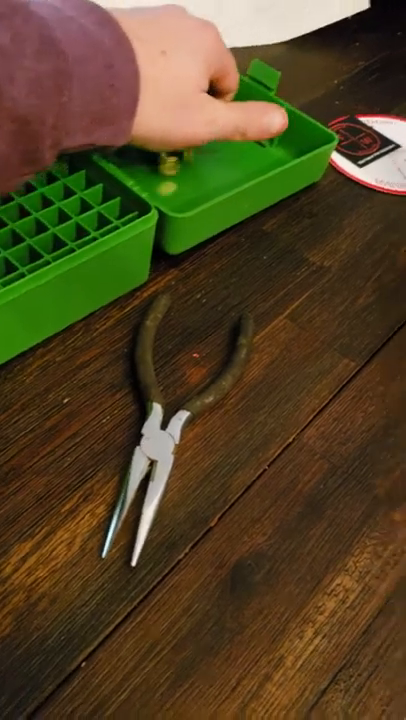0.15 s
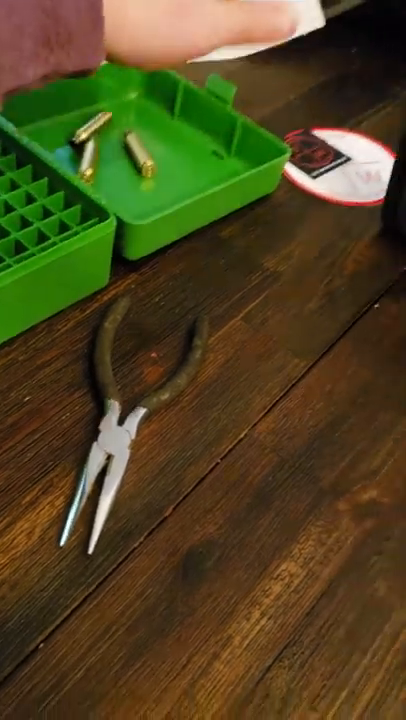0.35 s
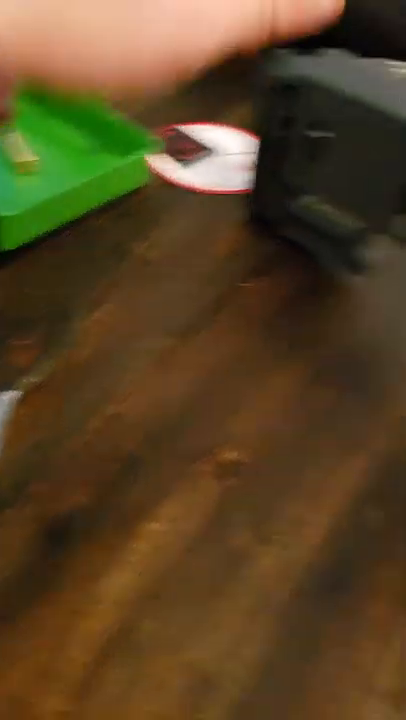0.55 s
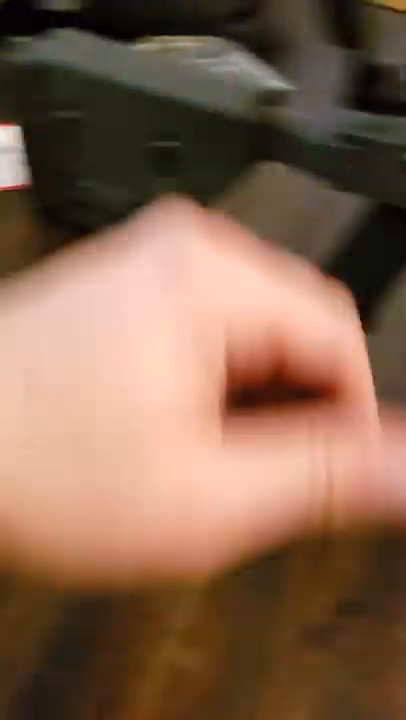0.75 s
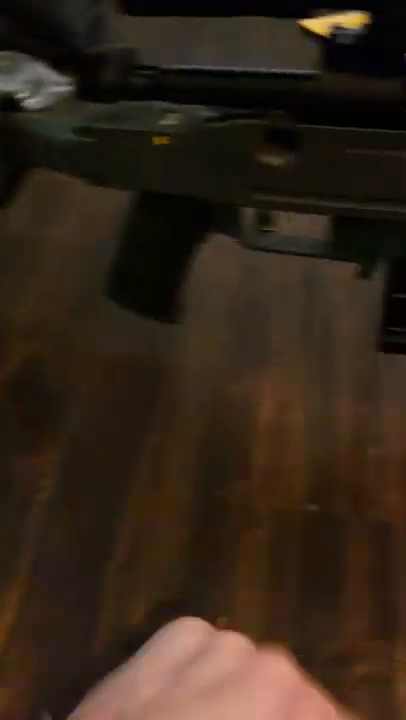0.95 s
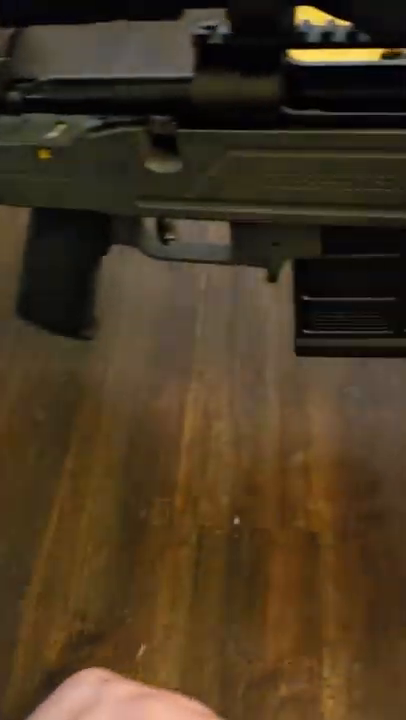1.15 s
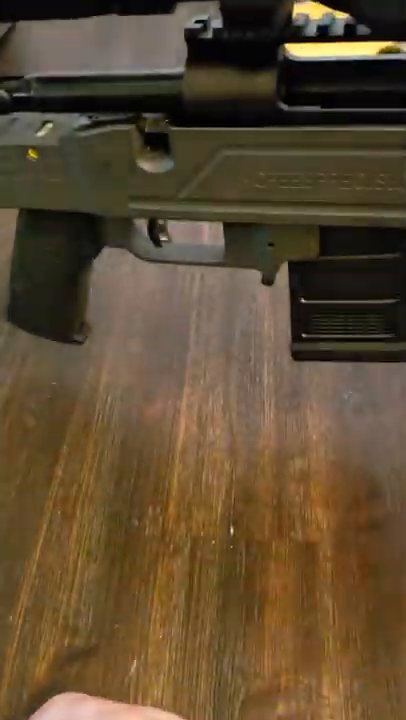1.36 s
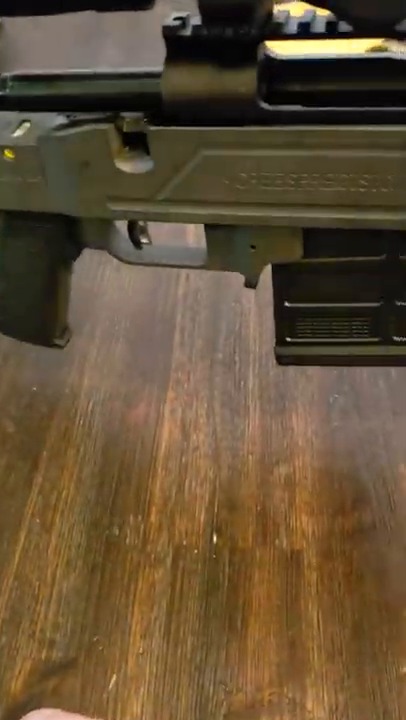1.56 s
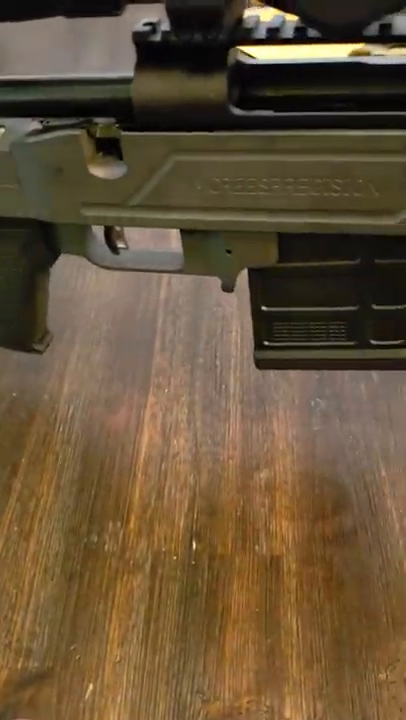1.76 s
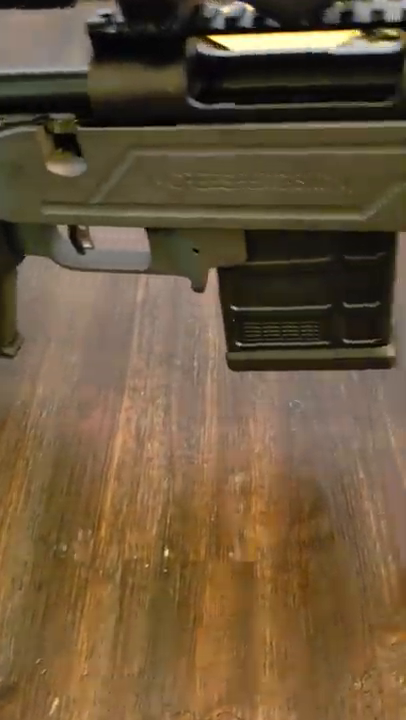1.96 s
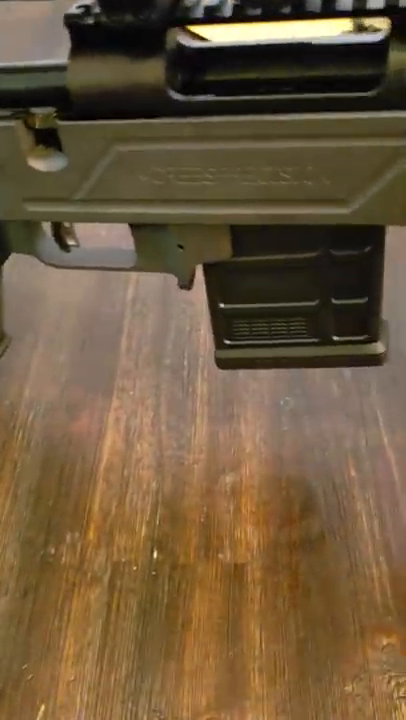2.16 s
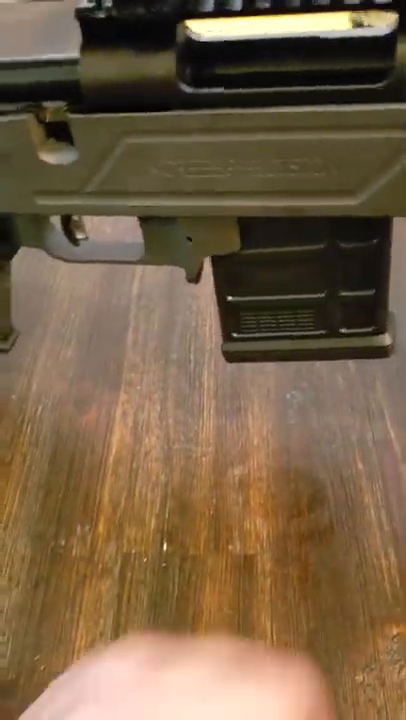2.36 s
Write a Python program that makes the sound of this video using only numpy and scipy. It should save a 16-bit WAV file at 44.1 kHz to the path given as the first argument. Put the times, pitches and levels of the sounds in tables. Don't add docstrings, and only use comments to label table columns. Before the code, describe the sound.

A sharp burst of small brass cases hitting thin plastic, a softer woody thud, light rattling, then a firm click and a louder snap of plastic parts, heard by a close phone microphone in a quiet room.

```python
import sys
import numpy as np
from scipy import signal
from scipy.fft import rfft, irfft
from scipy.io import wavfile
from scipy.ndimage import uniform_filter1d, map_coordinates

SR = 44100
rng = np.random.default_rng(int(sys.argv[2]) if len(sys.argv) > 2 else 0)


def ratio_of_db(decibels):
    return 10 ** (np.asarray(decibels, float) / 20)


def output_pcm(signal):
    pcm = np.clip(np.atleast_2d(signal).T, -1, 1) * 32767
    wavfile.write(sys.argv[1], SR, np.round(pcm).astype(np.int16))


N = 105840

# mode in Hz, level in dB, t60 in seconds.
GRIP_MODES = [(296, -9, 0.14), (508, 1.5, 0.073), (783, -9, 0.14), (972, -5, 0.06), (1267, 0, 0.047),
              (1900, -8, 0.087), (2380, -4.5, 0.058), (2982, -4.5, 0.096), (4760, -15, 0.073)]


def band(x, lo_hz, hi_hz):
    return signal.sosfilt(signal.butter(2, [lo_hz, min(hi_hz, 20000)], "band", fs=SR, output="sos"), x)


def noise_band(hz, width_hz):
    return band(pair(N), hz - width_hz / 2, hz + width_hz / 2) * np.sqrt(SR / 2 / width_hz)


def ring_down(t, t60):
    return np.exp(-np.log(1000) * t / t60)


def curve(table):
    seconds, db = np.array(table).T
    return ratio_of_db(np.interp(np.arange(N) / SR, seconds, db))


def colour(x, tone):
    f = np.maximum(np.arange(N // 2 + 1) * SR / N, 1)
    hz, db = np.array(tone).T
    y = irfft(rfft(x) * ratio_of_db(np.interp(np.log(f), np.log(hz), db)), N)
    return y / np.sqrt(np.mean(y ** 2))


def pair(n):
    mid, side = rng.standard_normal((2, n))
    side = signal.sosfilt(signal.butter(2, 520, "high", fs=SR, output="sos"), side)
    return np.array([mid + side, mid - side]) / np.sqrt(2)


def walk(rate):
    k = int(SR / rate)
    steps = np.repeat(rng.standard_normal(N // k + 1), k)
    return 1.3 * uniform_filter1d(uniform_filter1d(steps, k), k)[:N]


def place(x, pan_db, lag, skew=0.54):
    scatter_s, scatter = .002, .2
    left = map_coordinates(x, [np.arange(N) - lag], mode="nearest")
    taps = rng.standard_normal(300) * np.exp(-np.arange(300) / SR / scatter_s)
    high = band(x, 600, 15000)
    scattered = signal.fftconvolve(high, taps / np.linalg.norm(taps))[:N]
    echo = skew * (signal.hilbert(high).imag + scatter * scattered)
    return np.array([left * ratio_of_db(pan_db / 2) + echo, x * ratio_of_db(-pan_db / 2) - echo])


def blows(rows, modes, push_s=0.00055, rough=0.91, scatter_db=3, detune=.022):
    crack_s, crack_cycles, tick_s, air_db = 0.00077, 0.87, .0016, -5.0
    out, t = np.zeros(N + SR), np.arange(SR // 4) / SR
    hz, db, t60 = np.array(modes).T[:, :, None]
    rise = 1 - np.exp(-t / push_s)
    for s, peak_db, crack_hz, tick_db, body_db in rows:
        level_chance, pitch_chance = rng.standard_normal((2, len(modes), 1))
        noise = rng.standard_normal((len(modes), len(t)))
        hiss = rng.standard_normal(len(t))

        crack_noise = band(hiss, crack_hz / 2, crack_hz * 1.5) * np.sqrt(SR / 3 / crack_hz)
        crack = np.sin(2 * np.pi * crack_hz * t) + 0.28 * crack_noise
        crack = crack * np.exp(-t / (crack_s + crack_cycles / crack_hz))

        tick = band(hiss, 1500, 12000) + ratio_of_db(air_db) * band(hiss, 13000, 16800)
        tick = tick * np.exp(-t / tick_s)

        cluster = np.array([band(v, f / 1.14, f * 1.155) * np.sqrt(SR / f) for v, f in zip(noise, hz[:, 0])])
        tone = np.sin(2 * np.pi * hz * (1 + detune * pitch_chance) * t) + rough * cluster
        body = (ratio_of_db(db + scatter_db * level_chance) * tone * ring_down(t, t60)).sum(axis=0)

        i = int(s * SR)
        blow = rise * (1.545 * crack + ratio_of_db(body_db) * body / 3) + ratio_of_db(tick_db) * tick
        out[i:i + len(t)] += ratio_of_db(peak_db) * blow
    return out[:N]


def case_drops():
    # start in seconds, peak in dB, crack pitch in Hz, sharp tick in dB, body in dB.
    drop_rows = [(.2314, -7.5, 3510, -3.5, -10), (.2435, -21.5, 12000, 2.5, -27),
                 (.2460, -12.5, 3600, -12.5, -13.5), (.2475, -16.5, 4870, -11, -14),
                 (.2545, -16, 4200, -13.5, 0), (.2590, -16.5, 5560, -9, -5),
                 (.2652, -14.5, 2000, -13, -2.5), (.2698, -15, 2500, -8.5, -6.5),
                 (.2728, -19.5, 5000, -1, -15), (.2748, -6.5, 1696, -1, -12), (.2830, -19, 2100, -12.5, -4),
                 (.2875, -18, 5000, -9, -4), (.2928, -20.5, 4500, -7, -5), (.2958, -13, 1502, -9.5, -4),
                 (.2980, -11, 5650, 2, -16), (.3000, -9.5, 2230, -5, -15), (.3050, -17.5, 520, -23.5, -7.5),
                 (.3072, -19.5, 1120, -19, -6.5), (.3185, -22.5, 1900, -15, -8.5),
                 (.3255, -17.5, 2060, -14.5, -9), (.3282, -13, 1140, -13, -6), (.3290, -20, 2200, -16, -10),
                 (.3335, -20, 2140, -13.5, -9), (.3460, -29.5, 1500, -11, -0.5), (.4205, -52, 11100, 3, -5),
                 (.4950, -27.5, 1333, -18, -8.5), (.4954, -23.5, 2295, -41, -9),
                 (.4958, -32, 4160, -30, -10.5), (.5326, -22.5, 3860, -6, -5.5),
                 (.5360, -24, 1740, -36, -15.5), (.5445, -24.5, 2570, -12, -11.5)]
    # mode in Hz, level in dB, t60 in seconds.
    tray_modes = [(276.6, -12.5, 0.37), (408.8, -8, 0.24), (532, -10.5, 0.12), (1205, -1.5, 0.093),
                  (1790, -2, .06), (2120, 0, .045), (2900, -6.5, .04), (3730, -9.5, 0.056),
                  (4600, -15, .04)]
    return place(blows(drop_rows, tray_modes), 1.3, -0.17)


def brass():
    # start in seconds, level in dB, length until damped in seconds, t60 in seconds, pitch in Hz.
    wall_rings = [(0.161, -52, 0.023, .12, 11100), (.195, -55.5, 0.038, 0.24, 11300),
                  (0.2345, -20, 0.011, 0.32, 11170), (0.2466, -16, 0.031, 1.7, 11230),
                  (0.278, -17, .019, 1.3, 11280), (.301, -36, .014, .3, 11340),
                  (0.301, -40, 0.15, 0.33, 11370), (0.533, -44.5, 0.099, 0.15, 11250),
                  (1.238, -51, 0.022, .2, 11060), (1.262, -56, 0.014, 0.26, 11200),
                  (1.277, -51.5, 0.063, 0.17, 11130), (2.034, -45.5, 0.062, 0.2, 11100)]
    swell_s, damp_s, split_hz, partner_db = .003, .006, 110, -13.0
    out, t = 0, np.arange(N) / SR
    for s, db, length, t60, hz in wall_rings:
        u = np.maximum(t - s, 0)
        tone = np.sin(2 * np.pi * np.array([[hz], [hz + split_hz]]) * u)
        fade = ring_down(u, t60) * np.exp(-np.maximum(u - length, 0) / damp_s)
        out = out + ratio_of_db(db) * (1 - np.exp(-u / swell_s)) * fade * tone
    lower, upper = out * ratio_of_db(1.5 * walk(150))
    return place(lower, 2.7, .5, skew=0) + ratio_of_db(partner_db) * place(upper, 1.5, -1.4, skew=0)


def thuds():
    # start in seconds, peak in dB, crack pitch in Hz, sharp tick in dB, body in dB.
    thud_rows = [
        (1.0524, -20.5, 865, -30, -5),
        (1.0560, -20.5, 1250, -49, -5.5),
        (1.0590, -23.5, 584, -30, -4),
        (1.0625, -20.5, 530, -23, -5),
        (1.0630, -32, 3740, -10, -27),
        (1.0660, -32, 597, -19, -10),
        (1.0690, -46, 7330, 3, -14),
        (1.0715, -25, 2700, -14, -2.5),
        (1.0830, -31, 500, -31, -11),
        (1.0910, -50, 2050, -22, 4),
    ]
    # mode in Hz, level in dB, t60 in seconds.
    table_modes = [(46.4, -22, 0.84), (164.6, 2, 0.11), (276, -10.5, 0.14), (525.4, 2, 0.093),
                   (619, -10, 0.061), (970, -5.5, 0.09), (1250, -19, 0.05), (1968, -14, 0.072)]
    return place(blows(thud_rows, table_modes, push_s=0.00073), -2.2, 5.4, skew=0.2)


def rattles():
    # start in seconds, peak in dB, crack pitch in Hz, sharp tick in dB, body in dB.
    rattle_rows = [(1.2108, -29.5, 5400, -10.5, -7), (1.2250, -49, 10500, -13, -15),
                   (1.2282, -50, 13000, -12, -1), (1.2375, -32.5, 13500, -10, -3),
                   (1.2410, -42, 3480, -19, 2), (1.2475, -34, 15160, -22, -10),
                   (1.2603, -32.5, 5400, -11.5, -0.5), (1.2615, -35, 1330, -14, -7),
                   (1.2680, -48, 5500, -16, 8.5), (1.2745, -50.5, 4970, -7, -1),
                   (1.2775, -46.5, 14730, -6, 8), (1.2815, -47.5, 14000, -8, 6.5),
                   (1.2930, -34.5, 2470, -22, 0), (1.2945, -49, 5000, -19, -3),
                   (1.3015, -36, 520, -25, -10)]
    # mode in Hz, level in dB, t60 in seconds.
    lid_modes = [(303, -15.5, 0.2), (410.4, -10, 0.14), (520, -4, 0.095), (1240, -2.5, 0.068),
                 (2000, -0.5, 0.038), (2900, -2.5, 0.028), (5400, -25, 0.017)]
    return place(blows(rattle_rows, lid_modes), 0.44, -0.083)


def clicks():
    # start in seconds, peak in dB, crack pitch in Hz, sharp tick in dB, body in dB.
    click_rows = [
        (1.8632, -22, 2710, -11.5, -4.5),
        (1.9485, -32, 2900, -14.5, -8.5),
        (2.0010, -42.5, 2878, -21, -2.5),
        (2.0270, -57, 2220, -40, 4.5),
        (2.0303, -10, 2541, -16, -16),
    ]
    return place(blows(click_rows, GRIP_MODES, rough=0.97), -4.5, 0.65)


def ticks():
    # start in seconds, peak in dB, crack pitch in Hz, sharp tick in dB, body in dB.
    tick_rows = [
        (.161, -52, 3255, 1.5, -14.5),
        (.9241, -65, 2468, 8, 0),
        (1.007, -50.5, 2520, -16, -6.5),
        (1.0129, -47, 1290, -17, -30),
        (1.5138, -58.5, 1308, -27, 6.5),
        (1.5826, -47, 11560, -8.5, -11.5),
        (1.6036, -48, 2200, -8, -1),
        (1.7607, -47, 1240, -43, -33),
        (2.1608, -52.5, 5770, -0.5, -11.5),
    ]
    return place(blows(tick_rows, GRIP_MODES), -0.65, .3)


def grains(level, tone, rate, spread_db, bed):
    size = ratio_of_db(spread_db * np.minimum(rng.exponential(size=N), 2))
    hit = (rng.random(N) < rate / SR) * size
    rub = pair(N) * (uniform_filter1d(hit, 60) * 60 + bed) * ratio_of_db(1.4 * walk(25))
    return curve(level) * colour(rub, tone)


def clatter():
    # time in seconds, level in dB.
    clatter_level = [(.230, -74), (.238, -25.5), (.262, -22.5), (.300, -28), (.335, -33.5), (.37, -43),
                     (.44, -74)]
    # frequency in Hz, level in dB.
    clatter_tone = [(130, -7), (250, -5.5), (1200, -6), (2200, -10.5), (5000, -11), (9000, -17.5),
                    (16000, -9)]
    return grains(clatter_level, clatter_tone, 700, 3.0, 2.0)


def shuffle():
    # time in seconds, level in dB.
    shuffle_level = [(.05, -87), (.22, -75.5), (.75, -88), (.95, -69), (1.04, -62), (1.07, -30.5),
                     (1.17, -55), (1.27, -50.5), (1.34, -54.5), (1.45, -59), (1.6, -58.5), (1.84, -56),
                     (1.9, -40.5), (2.0, -57.5), (2.08, -50), (2.2, -71), (2.4, -66)]
    # frequency in Hz, level in dB.
    shuffle_tone = [(88, -49.5), (150, -8.5), (291, 7), (361, 3.5), (524, -5.5), (1120, -15), (3220, -19.5),
                    (4490, -27.5), (16000, -39)]
    return grains(shuffle_level, shuffle_tone, 120, 3.5, 1.6)


def scrapes():
    # start in seconds, length in seconds, level in dB, centre in Hz, width in Hz.
    rubs = [
        (0.094, 0.15, -70.5, 3500, 1100),
        (1.134, 0.09, -57, 3160, 1200),
        (0.88, 0.13, -78, 4200, 700),
        (2.322, 0.119, -63, 9800, 11800),
    ]
    out, t = 0, np.arange(N) / SR
    for s, length, db, hz, width_hz in rubs:
        swell = np.sin(np.pi * np.clip((t - s) / length, 0, 1))
        out = out + ratio_of_db(db + 3.7 * walk(42)) * swell * noise_band(hz, width_hz)
    return out


def room(dry):
    # band centre in Hz, t60 in seconds, level in dB.
    reflections = [(125, 0.91, -15.5), (235, 0.39, -24.5), (500, 0.74, -18.5), (1060, 0.28, -14),
                   (2000, 0.31, -11.5), (3700, 0.26, -4), (8300, 0.11, -15), (12810, 0.31, -6)]
    delay_s = 0.0024
    t, ir = np.arange(SR // 2) / SR, 0
    for hz, t60, db in reflections:
        ir = ir + ratio_of_db(db) * band(pair(len(t)), hz / 1.23, hz * 1.415) * ring_down(t, t60)
    ir = ir * (1 - np.exp(-(t / delay_s) ** 2)) / 20
    mono = dry.mean(axis=0)
    high = band(mono, 1000, 19000)
    scattered = mono - high + high * walk(900)
    return signal.fftconvolve(scattered[None], ir, axes=1)[:, :N]


def floor():
    # time in seconds, level in dB.
    floor_gain = [(.2, -55), (.6, -59), (.8, -68), (1.0, -62.5), (1.5, -61), (2.0, -54.5), (2.4, -57)]
    # frequency in Hz, level in dB.
    air_tone = [(25, -18.5), (118, 1.5), (200, -10.5), (550, -31), (720, -45.5), (7000, -43), (8500, -40.5),
                (14000, -31)]
    # frequency in Hz, level in dB.
    hum_tones = [(80.4, -71), (120.2, -63)]
    # centre in Hz, width in Hz, level in dB.
    whine_bands = [(3550, 90, -30.5), (5500, 260, -25), (6700, 800, -21)]
    t = np.arange(N) / SR
    out = ratio_of_db(-4.0) * colour(pair(N), air_tone)
    for hz, db in hum_tones:
        wobble = 1.1 * walk(42)
        out = out + ratio_of_db(db + 60 + 3.0 * walk(7.9)) * np.sin(2 * np.pi * hz * t + wobble)
    for hz, width_hz, db in whine_bands:
        out = out + ratio_of_db(db + 2 * walk(1)) * noise_band(hz, width_hz)
    return curve(floor_gain) * out


def scene():
    near = case_drops() + thuds() + rattles() + ticks() + clatter() + shuffle() + scrapes()
    snaps = clicks()
    return near + snaps + brass() + room(near + .6 * snaps) + floor()


def low_pass(x):
    return signal.sosfilt(signal.butter(12, 17150, fs=SR, output="sos"), x)


def record(dry):
    soft = .9 * np.tanh((dry - uniform_filter1d(dry, 2000)) / .9)
    top_cut = signal.ellip(6, .3, 35, 15900, fs=SR, output="sos")
    return low_pass(signal.sosfilt(top_cut, soft))


dry = scene()
out = record(dry)
output_pcm(out)
```